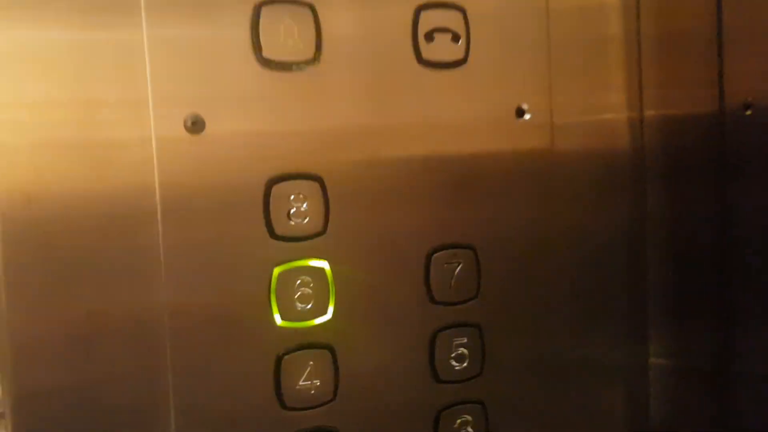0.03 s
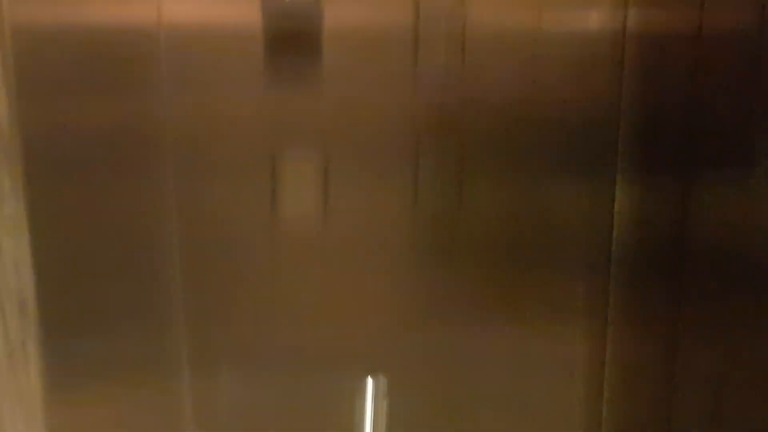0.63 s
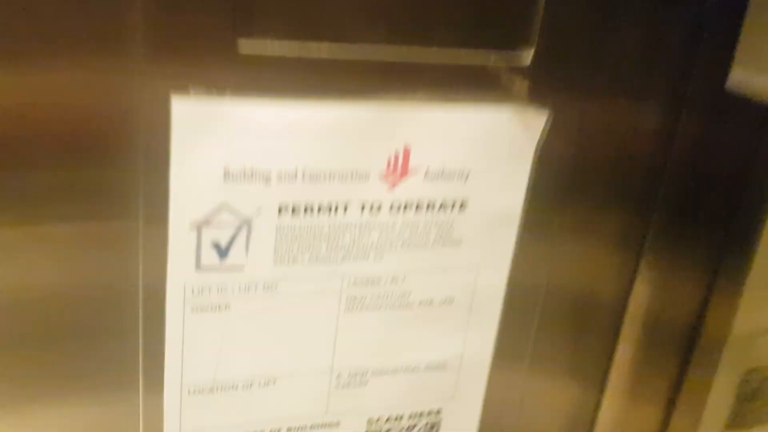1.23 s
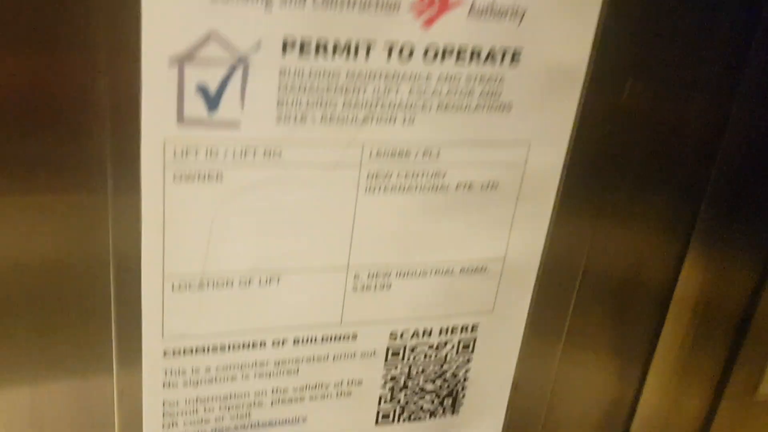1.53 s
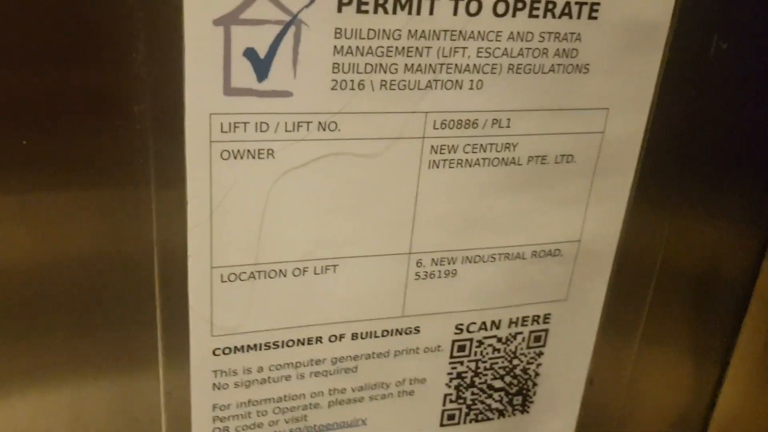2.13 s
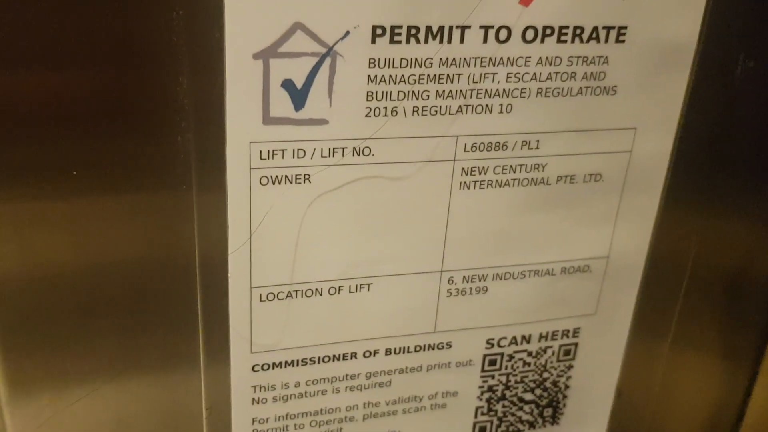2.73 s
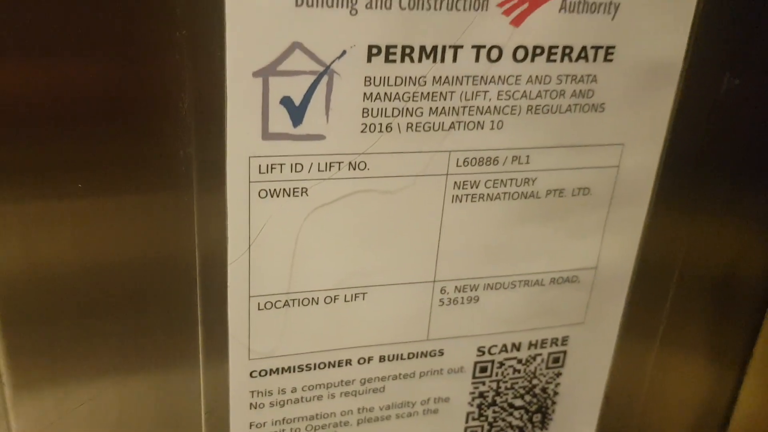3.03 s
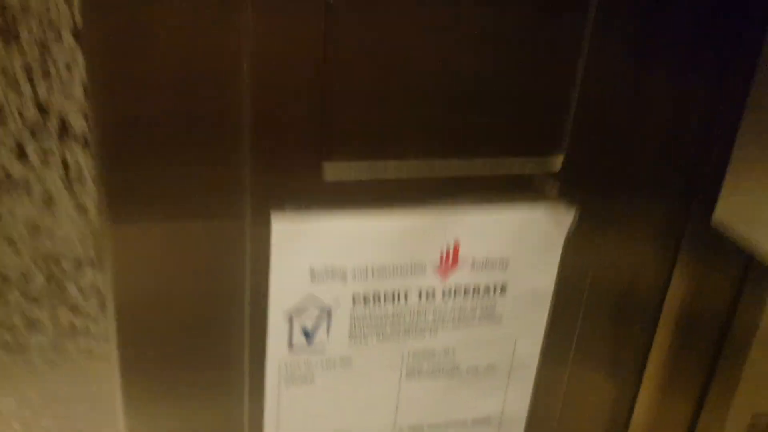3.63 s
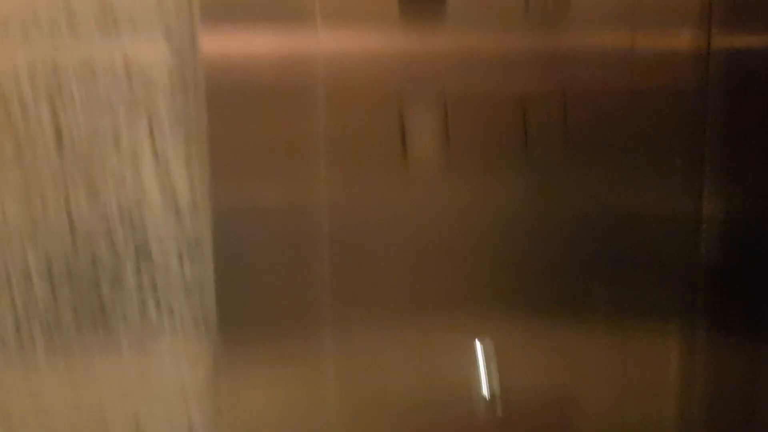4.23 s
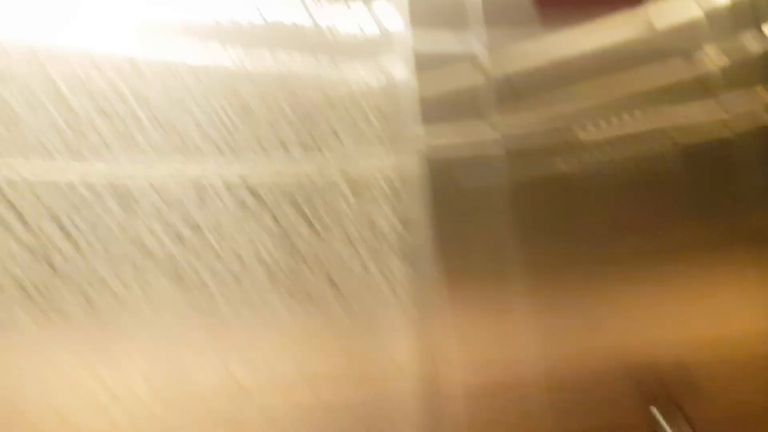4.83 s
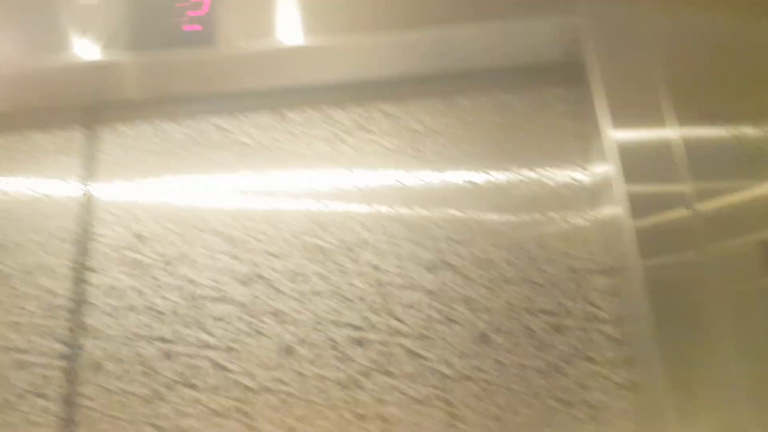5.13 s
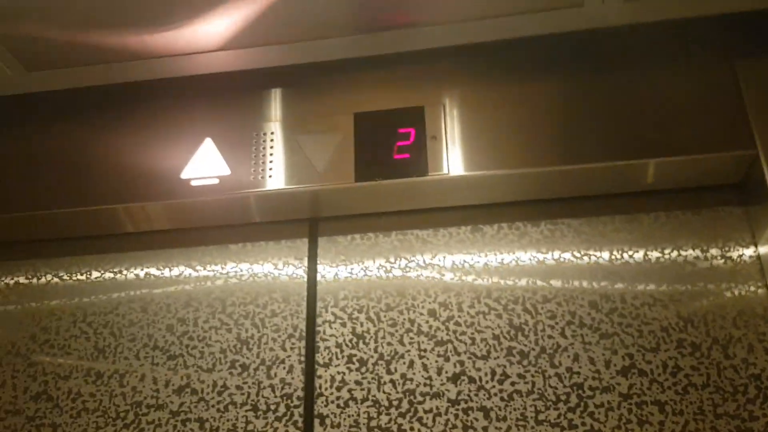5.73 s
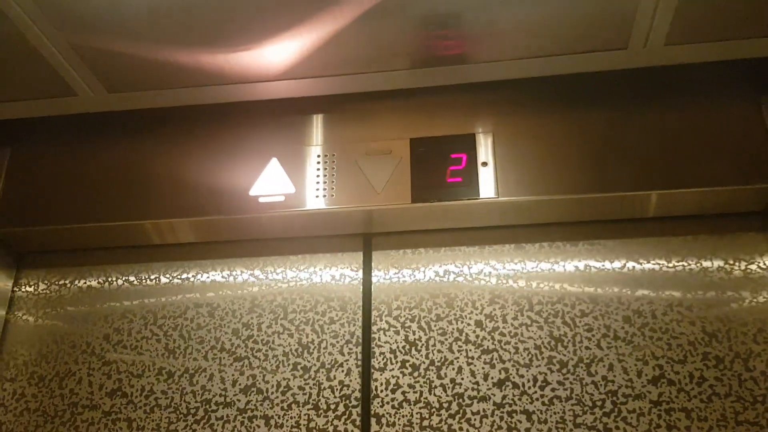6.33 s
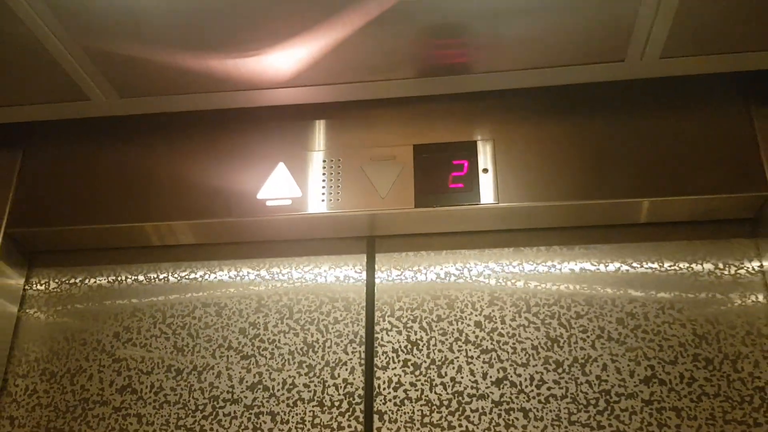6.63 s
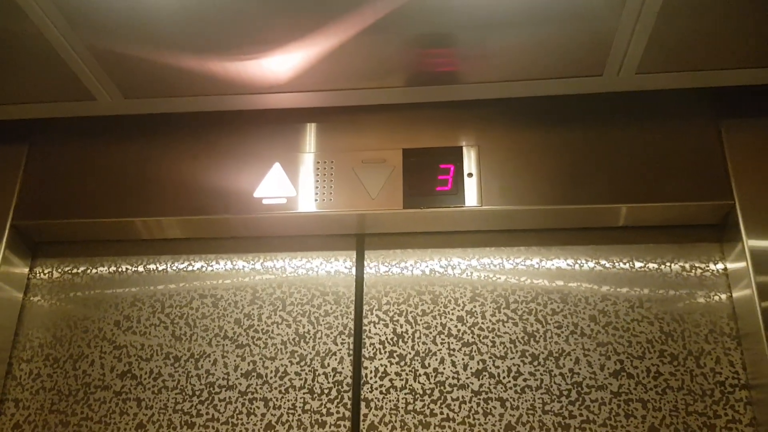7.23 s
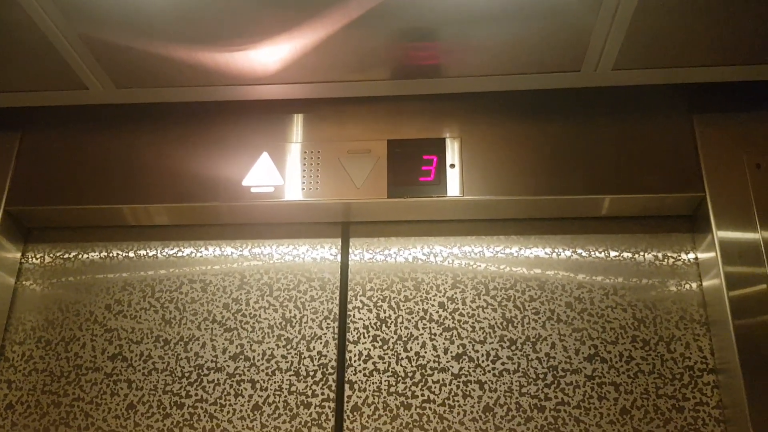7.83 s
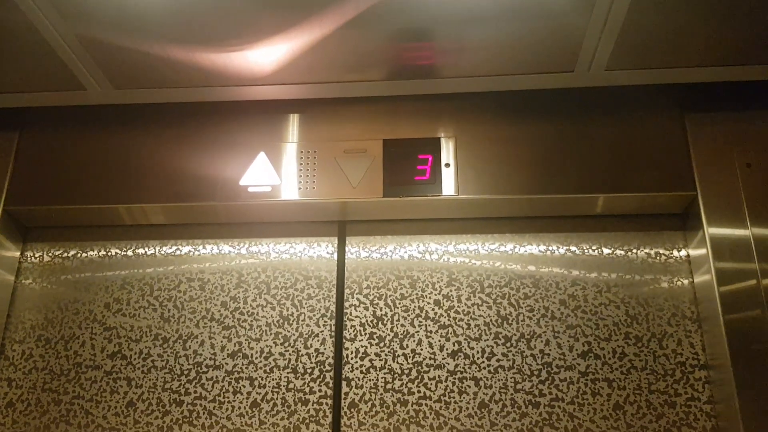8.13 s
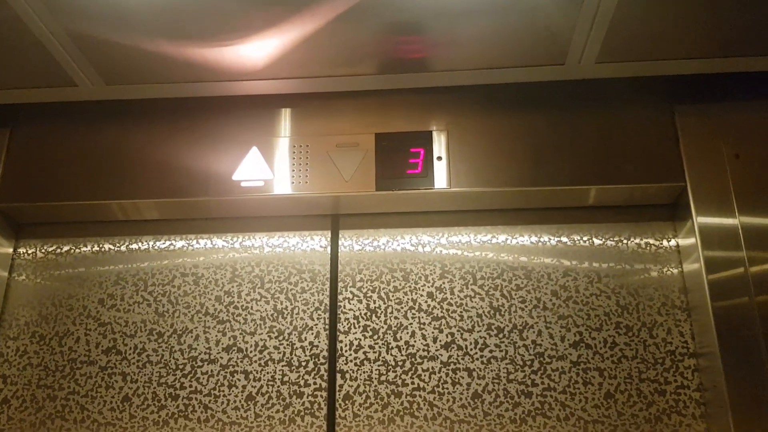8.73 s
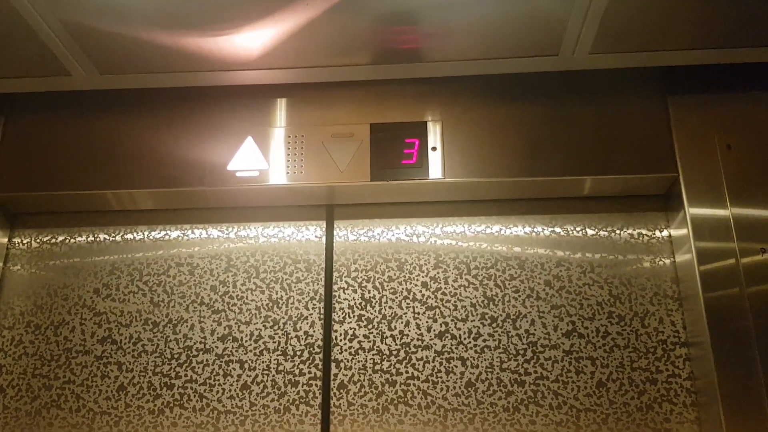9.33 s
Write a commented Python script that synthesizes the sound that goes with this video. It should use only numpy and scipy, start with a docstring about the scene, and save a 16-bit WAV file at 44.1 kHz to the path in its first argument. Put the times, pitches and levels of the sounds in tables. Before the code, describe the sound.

A low, beating machine hum and rumble fill a small steel lift car throughout, with faint fan whine and shaft air. An opening hiss and a soft rubbing moan die away over the first two seconds. A passenger shifts about: a light click at 0.6 seconds, a sharper knock ringing in the walls at 1.3, then another with scuffs and thin shoe squeaks around 1.6. From 2.7 to 3.3 seconds come more squeaks, knocks and several dull, booming floor thumps, the loudest moment. Small clicks and faint scuffs follow. The hum swells and dips as the microphone moves through the cabin. Between 4 and 7 seconds the guides moan faintly, with a soft bump near 6.2. From about 5 seconds the car gathers speed and the air rush grows; after 6 a deep roller drone joins. The ride continues steadily, with a faint tick near 8.3.

```python
"""Inside a steel lift car creeping upward: mains hum beats against drive tones over shaft air and frame
rumble; the guides moan and an opening hiss dies away. The tones swell and fade as the microphone is
carried through the cabin's standing waves. From 0.6 s a passenger shifts about: knocks, scuffs and sole
squeaks ring in the cabin, and the floor thumps near 3 s. From 4 s the microphone turns to the doors;
from 5 s the car gathers speed, the rush grows, and after 6 s the guide rollers drone."""
import sys
import numpy as np
from scipy import signal
from scipy.fft import rfft, irfft
from scipy.io import wavfile
from scipy.ndimage import uniform_filter1d

SR = 44100
rng = np.random.default_rng(int(sys.argv[2]) if len(sys.argv) > 2 else 0)


def file_out(sig):
    """Save sig as 16-bit WAV at sys.argv[1]."""
    # one column per channel
    cols = np.atleast_2d(sig).T
    # limit, then scale
    lim = np.clip(cols, -1, 1)
    pcm = np.round(lim * 32767).astype(np.int16)
    wavfile.write(sys.argv[1], SR, pcm)


N = 418509
TIME, FREQS = np.arange(N) / SR, np.fft.rfftfreq(N, 1 / SR)
SECOND, SECOND_HZ = TIME[:SR], np.fft.rfftfreq(SR, 1 / SR)


def gain_of(db):
    """Decibels to gain."""
    return 10 ** (np.asarray(db) / 20)


def unit_rms(x):
    """Scale to rms 1."""
    return x / np.sqrt(np.mean(x ** 2) + 1e-20)


def ramp(start_s, end_s):
    """Linear 0 to 1, held outside."""
    return np.clip((TIME - start_s) / (end_s - start_s), 0, 1)


def curve_at(points, hz):
    """Interpolate on a log-frequency axis."""
    point_hz, values = np.transpose(points)
    return np.interp(np.log(hz + 1), np.log(point_hz + 1), values)


def add(mix, start_s, sound):
    """Mix a sound in at a time."""
    part = mix[max(round(start_s * SR), 0):][:len(sound)]
    part += sound[:len(part)]


def drift(rate_hz):
    """Low-passed noise, unit rms."""
    return unit_rms(irfft(rfft(rng.standard_normal(N)) * np.exp(-(FREQS / rate_hz) ** 2), N))


def tone(hz, wander_hz=0.041):
    """Unit-rms sine, pitch wandering slightly."""
    cycles = np.cumsum(hz + wander_hz * drift(2.3)) / SR + rng.random()
    return np.sqrt(2) * np.sin(2 * np.pi * cycles)


def burst(spectrum_db):
    """One second of shaped noise, unit rms."""
    return unit_rms(irfft(rfft(rng.standard_normal(SR)) * gain_of(spectrum_db), SR))


def treble_shelf(db, corner_hz=6500):
    """Smooth high shelf in dB."""
    return db / (1 + (corner_hz / (SECOND_HZ + 1)) ** 4)


# Diffuse field at the two ports: (frequency [Hz], left-right correlation [-1..1])
PORT_CORRELATION = [(50, 0.84), (130, 1), (250, 0.83), (500, 0.66), (800, 0.24), (1200, -0.045),
                    (2000, -0.024), (15000, -0.042)]

def diffuse(spectrum_db, hz=FREQS, size=N):
    """Unit-rms stereo noise, alike in the bass, unrelated in the treble."""
    mid, side = rfft(rng.standard_normal((2, size)))
    correlation = curve_at(PORT_CORRELATION, hz)
    mid, side = mid * np.sqrt(1 + correlation), side * np.sqrt(1 - correlation)
    return unit_rms(irfft(np.array([mid + side, mid - side]) * gain_of(spectrum_db), size))


# Mains and drive tones: (pitch [Hz], base level [dB], flutter [dB], node height [m],
# gain at node [ratio], early boost [dB], turned boost [dB], full-speed boost [dB])
HUM_TONES = [(100.1, -35.5, .4, 0.93, 1.11, 5, 1.5, -4.5), (199, -56.5, 3.5, 0.46, 0.57, 7, -2.5, 11),
             (299.5, -41.5, 1.3, -0.011, 0.088, 0, -21, 1.5),
             (119.54, -34, 0.73, -0.13, 0.64, 1.5, -8.5, -3.5),
             (220.8, -47.5, 0.94, 0.036, .14, 3.5, 2.5, 1.5)]

def hum(early, turned, speed, height_m, load_power=3.7, sound_m_per_s=343):
    """Each tone is a standing wave in the cabin; mains and drive, about 20 Hz apart, beat."""
    out = np.zeros(N)
    for hz, db, flutter_db, node_m, node_gain, early_db, turned_db, speed_db in HUM_TONES:
        standing = np.hypot(np.sin(2 * np.pi * hz * (height_m - node_m) / sound_m_per_s), node_gain)
        change_db = early_db * early ** 2 + turned_db * turned + speed_db * speed ** load_power
        out += gain_of(db + change_db + flutter_db * drift(4.0)) * standing * tone(hz)
    return out


# Fan and electronics: (pitch [Hz], half-width [Hz], level [dB])
FAN_WHISTLES = [(76.3, 3.5, -48.5), (499, 4.5, -60), (648, 34, -57.5), (914, 7, -67.5), (4000, 200, -85),
                (4620, 130, -74), (7760, 62, -78.5)]

def whistles():
    """Narrow resonances kept ringing by noise."""
    return sum(gain_of(db) * diffuse(-20 * np.log10(1 + ((FREQS - hz) / half_width_hz) ** 2))
               for hz, half_width_hz, db in FAN_WHISTLES)


def cabin_ripple(depth_db=1.8, spacing_hz=14, above_hz=500):
    """Fine spectral ripple in dB from the cabin's many close resonances."""
    centres_hz = np.arange(0, SR / 2, spacing_hz)
    ripple = np.interp(FREQS, centres_hz, rng.standard_normal(len(centres_hz)))
    return depth_db * ripple * (FREQS > above_hz)


# Frame rumble, shaft rush, airy hiss: (frequency [Hz], relative density [dB])
RUMBLE_SPECTRUM = [(10, -22), (25, -9), (45, -8.5), (62, -3), (80, -3), (115, 1.5), (150, -6), (190, -9),
                   (280, -12.5), (500, -30), (1500, -90)]
RUSH_SPECTRUM = [(90, -37), (165, -22), (215, -4), (260, -15), (330, -10.5), (470, -11), (770, -13.5),
                 (900, -16.5), (1100, -17), (1600, -20.5), (2300, -24.5), (3500, -35.5), (4800, -36),
                 (6500, -41.5), (15000, -45.5)]
HISS_SPECTRUM = [(150, -3), (350, 0), (700, -0.5), (1000, -3), (2000, -10), (3200, -15.5), (4600, -19),
                 (6500, -22), (9500, -20.5), (12000, -26.5), (15500, -28.5)]
# Cabin resonances under the rush: (centre [Hz], width [Hz], boost [dB])
CABIN_RESONANCES = [(318, 20, 3), (410, 22, 5), (447, 20, 6), (527, 22, 5), (600, 40, 3), (732, 28, 9),
                    (1600, 70, 5)]

def ride_noise(early, speed, height_m):
    """The frame rumbles, air and guide noise from the shaft excites the cabin, and air hisses."""
    ripple_db = cabin_ripple()
    resonance_db = sum(db / (1 + (2 * (FREQS - hz) / width_hz) ** 2)
                       for hz, width_hz, db in CABIN_RESONANCES)
    rumble_db = -48 + 11 * height_m + 6 * early + 1.5 * speed
    rush_db = -51.5 - 4.5 * early + 7 * speed + 0.17 * drift(27)
    hiss_db = -54 + 10 * early + .5 * drift(1.8)
    rumble = gain_of(rumble_db) * diffuse(curve_at(RUMBLE_SPECTRUM, FREQS))
    rush = gain_of(rush_db) * diffuse(curve_at(RUSH_SPECTRUM, FREQS) + resonance_db + ripple_db)
    hiss = gain_of(hiss_db) * diffuse(curve_at(HISS_SPECTRUM, FREQS) + ripple_db)
    return rumble + rush + hiss


def stick_slip(rows, glide_share):
    """Surfaces stick and slip: a rough tone swells, glides upward and fades."""
    out = np.zeros(N)
    for start_s, length_s, hz, width_hz, db in rows:
        progress = SECOND[SECOND < length_s] / length_s
        cycles = np.cumsum(hz * (1 + glide_share * (progress - .5))) / SR
        roughness = burst(-20 * np.log10(1 + (2 * SECOND_HZ / width_hz) ** 2))[:len(progress)]
        rub = roughness * np.sin(2 * np.pi * cycles) * np.sin(np.pi * progress)
        add(out, start_s, gain_of(db) * unit_rms(rub) / np.sqrt(2))
    return out


# Guide and frame moans: (time [s], length [s], pitch [Hz], width [Hz], level [dB])
GUIDE_MOANS = [(0, 0.88, 154.6, 43, -43.5), (0, 0.85, 664, 57, -57.5), (4.15, 0.94, 415, 34, -54),
               (4.1, 0.97, 178, 24, -49.5), (5.3, 1, 421.7, 100, -51.5), (5.93, 0.35, 620, 4.1, -48),
               (6.25, 0.63, 619, 5.4, -53), (8.2, 0.34, 76.4, 6.8, -38)]

def moans():
    """Guides and frame rub briefly as the car travels."""
    return stick_slip(GUIDE_MOANS, glide_share=0.017)


# Blows: (time [s], level [dB], body [dB], treble [dB], bright peak [Hz], rattle decay [s])
BLOWS = [(.633, -40.5, -19, -5, 5950, 0.015), (1.303, -30.5, 1.5, 1.5, 4370, 0.02),
         (1.654, -40.3, -8.5, -6, 2000, .031), (2.902, -36.5, 0, 5, 2050, 0.042),
         (3.018, -37, 4.5, 4, 1160, 0.021), (3.363, -52, -20, 16, 8350, .008),
         (3.546, -42.5, -2, 4, 15000, 0.0045), (4.459, -50.5, -28, -12, 2400, 0.023),
         (6.2, -42, 18, -32, 260, 0.11), (8.299, -53.5, -17, 4, 5500, 0.013)]
# Blow noise: (frequency [Hz], relative density [dB])
BLOW_SPECTRUM = [(60, -4), (150, 4.5), (300, 3.5), (480, 0.5), (750, -2), (1200, -0.5), (1800, -8),
                 (2800, -9), (4400, -10.5), (6500, -16), (9500, -13.5), (12000, -25), (15500, -24)]
# Steel wall modes: (frequency [Hz], level [dB], T60 [s])
WALL_MODES = [(236.5, -12, 0.4), (285, -1.5, 0.23), (315, -0.5, 0.15), (333.4, -1, 0.35), (510, -5, 0.14),
              (698, -0.5, 0.11), (744, -4, 0.12), (1214, -20, .12), (2220, -21, 0.12), (4200, -18, .13),
              (4140, -18, .1), (4500, -18, 0.12)]

def knocks(body_hz=900, bright_db=5, grain_db=3.5, crack_db=-3, crack_s=0.0023,
           full_ring_db=-30, ring_db_per_db=1.28):
    """Each blow is a crack and a grainy rattle; hard ones ring the steel panels."""
    out = np.zeros(N)
    panel = sum(gain_of(db - 60 * SECOND / t60_s) * np.sin(2 * np.pi * hz * SECOND)
                for hz, db, t60_s in WALL_MODES)
    for start_s, db, body_db, treble_db, bright_hz, rattle_s in BLOWS:
        colour_db = curve_at(BLOW_SPECTRUM, SECOND_HZ) + treble_shelf(treble_db)
        colour_db += body_db / (1 + (SECOND_HZ / body_hz) ** 2)
        colour_db += bright_db * np.exp(-(2 * np.log2((SECOND_HZ + 1) / bright_hz)) ** 2)
        flicker = unit_rms(uniform_filter1d(rng.standard_normal(SR), size=90))
        grains = unit_rms(gain_of(grain_db * flicker))
        crack = gain_of(crack_db) * burst(colour_db + treble_shelf(3.5)) * np.exp(-SECOND / crack_s)
        rattle = burst(colour_db) * grains * np.exp(-SECOND / rattle_s)
        ring = gain_of(ring_db_per_db * (db - full_ring_db)) * panel
        add(out, start_s, gain_of(db) * (crack + rattle + ring))
    return out


# Cabin reverberation: (frequency [Hz], T60 [s])
CABIN_DECAY = [(100, 0.31), (500, 0.87), (2000, 0.46), (5000, 0.51), (9000, 0.37), (15000, 0.077)]

def cabin(dry, direct_db=-7, wet_db=2.1):
    """Close steel walls give an immediate, dense tail that outweighs the direct sound."""
    hz, age_s, spectra = signal.stft(diffuse(0, SECOND_HZ, size=SR), SR, nperseg=256)
    decay = gain_of(-60 * age_s / curve_at(CABIN_DECAY, hz)[:, None])
    tail = signal.istft(spectra * decay, SR, nperseg=256)[1]
    wet = signal.fftconvolve(dry[None], tail / np.linalg.norm(tail[0]), axes=1)[:, :N]
    return gain_of(direct_db) * dry + gain_of(wet_db) * wet


# Shoe and cloth strokes: (time [s], length [s], level [dB], treble [dB])
SCUFF_STROKES = [(1.441, 0.035, -52.5, 2), (2.756, 0.05, -53, -3), (2.931, 0.24, -54.5, 6),
                 (3.172, .1, -61.5, 8), (4.029, .084, -59.5, 9), (4.367, 0.14, -61, 8),
                 (4.724, 0.056, -64, 3), (5.162, 0.053, -60, 6), (5.521, 0.1, -56.5, -1),
                 (6.216, 0.57, -69, 30), (7.87, 0.063, -57, -5)]
# Friction noise: (frequency [Hz], relative density [dB])
SCUFF_SPECTRUM = [(200, -8), (1000, 8), (2500, -2.5), (5000, -1), (7500, -6.5), (10000, -2), (11500, -5),
                  (13500, -7), (15500, -32)]

def scuffs(grain_db=2):
    """Shoes and clothes slide in short, grainy strokes of friction."""
    out = np.zeros(N)
    for start_s, length_s, db, treble_db in SCUFF_STROKES:
        stroke = np.sqrt(abs(np.sin(np.pi * np.minimum(SECOND / length_s, 1))))
        friction = burst(curve_at(SCUFF_SPECTRUM, SECOND_HZ) + treble_shelf(treble_db))
        add(out, start_s, gain_of(db) * friction * stroke)
    return out * gain_of(grain_db * drift(150))


# Sole squeaks: (time [s], length [s], pitch [Hz], width [Hz], level [dB])
SOLE_SQUEAKS = [(1.45, 0.05, 8450, 800, -59), (1.578, 0.027, 7250, 300, -55.5),
                (1.609, 0.075, 9460, 455, -52.5), (2.725, 0.032, 7200, 300, -60),
                (2.792, .1, 8220, 910, -50), (2.83, .28, 7610, 700, -50.5), (2.875, .061, 10140, 300, -53),
                (2.98, .04, 12500, 600, -63), (3.16, 0.058, 7730, 800, -57)]

def squeaks(chatter_db=0.5):
    """Soles stick and slip in high, chattering chirps."""
    return stick_slip(SOLE_SQUEAKS, glide_share=.04) * gain_of(chatter_db * drift(60))


# Floor thumps: (time [s], level [dB], pitch [Hz], rise [s], decay [s])
FLOOR_THUMPS = [(2.9, -14.3, 111, .055, .018), (2.99, -20.5, 106, .025, .03),
                (3.035, -14.6, 102, .075, .07), (3.225, -24, 102, .04, .075)]
# Thud noise: (frequency [Hz], relative density [dB])
THUD_SPECTRUM = [(15, -18), (35, -6), (70, -13), (130, -5.5), (190, -19.5), (240, -10), (300, -21.5),
                 (600, -36), (2000, -75)]

def thumps(floor_hz=69.9, floor_db=-17.5, thud_db=-16):
    """Shifting weight sets the floor and the cabin's lowest air mode booming, with a dull thud."""
    out = np.zeros(N)
    floor_mode = gain_of(floor_db) * np.sin(2 * np.pi * floor_hz * SECOND)
    for start_s, db, hz, rise_s, decay_s in FLOOR_THUMPS:
        attack = np.sin(np.pi / 2 * np.minimum(SECOND / rise_s, 1))
        decay = np.exp(-np.maximum(SECOND - rise_s, 0) / decay_s)
        boom = np.sqrt(2) * (np.sin(2 * np.pi * hz * SECOND) + floor_mode)
        thud = gain_of(thud_db) * burst(curve_at(THUD_SPECTRUM, SECOND_HZ))
        add(out, start_s, gain_of(db) * attack * decay * (boom + thud))
    return out


def rollers(hz=48.8, peak_db=-41.5, start_s=6.2, length_s=3.95):
    """Guide rollers drone in one long swell near full speed."""
    swell = np.sin(np.pi * ramp(start_s, start_s + length_s))
    return gain_of(peak_db) * swell * tone(hz)


# Microphone path: (time [s], height above its lowest point [m])
MIC_HEIGHT = [(0, .02), (.7, .08), (1.35, .28), (1.85, .57), (2.35, .72), (3.02, .57), (3.5, .28),
              (3.85, .03), (5.1, 0), (5.85, .26)]

def scene(turned_left_minus_right_db=-1.3):
    """Car speed and microphone position steer the machinery's sound; the passenger moves about."""
    early = 1 - ramp(0.59, 2.6)  # opening hiss and extra hum die away
    turned = ramp(3.83, 6.2)  # microphone: wall to doors
    speed = ramp(4.8, 6.98)  # creep to full speed
    height_m = np.interp(TIME, *np.transpose(MIC_HEIGHT))
    pan = gain_of(np.outer([.5, -.5], turned_left_minus_right_db * turned))
    drone = (hum(early, turned, speed, height_m) + rollers()) * pan
    car = drone + whistles() + ride_noise(early, speed, height_m) + moans()
    soles = squeaks()
    return car + thumps() + cabin(knocks()) + cabin(scuffs() + soles)


# Microphone hiss: (frequency [Hz], relative density [dB])
MIC_HISS_SPECTRUM = [(100, 18), (3000, -7), (6500, -16), (9500, -2.5), (11500, -3), (15500, -6.5)]
# Port colour: (frequency [Hz], left minus right [dB])
PORT_BALANCE = [(100, -.2), (1000, -1), (4000, -0.9), (6200, -1.5), (7200, 1.5), (8200, 6), (9600, 9),
                (10800, 4.5), (12300, -6.5), (14000, -2), (15500, -3)]

def record(dry, hiss_db=-65.5, cutoff_hz=15780):
    """Microphone hiss, each port's own colour, then the band limit."""
    heard = dry + gain_of(hiss_db) * diffuse(curve_at(MIC_HISS_SPECTRUM, FREQS))
    port_gains = gain_of(np.outer([.5, -.5], curve_at(PORT_BALANCE, FREQS)))
    coloured = irfft(rfft(heard) * port_gains, N)
    low_pass = signal.firwin(1023, cutoff_hz, window=("kaiser", 9), fs=SR)
    return signal.oaconvolve(coloured, low_pass[None], "same")


dry = scene()
out = record(dry)
file_out(out)
```